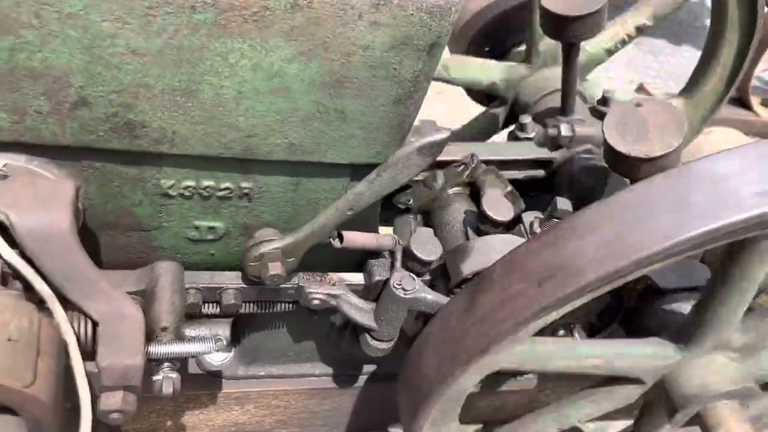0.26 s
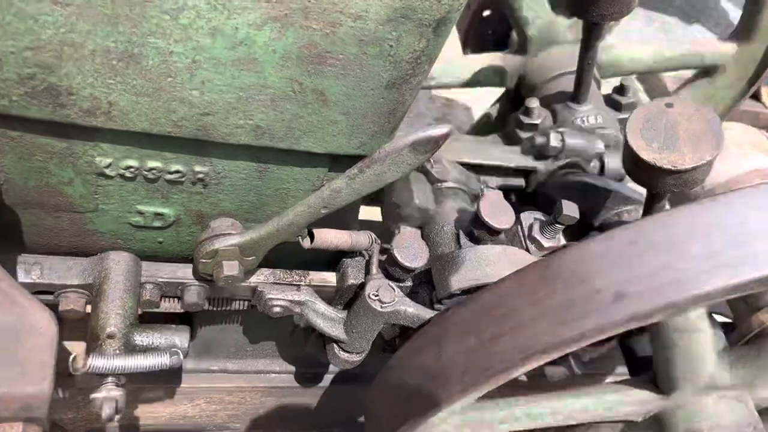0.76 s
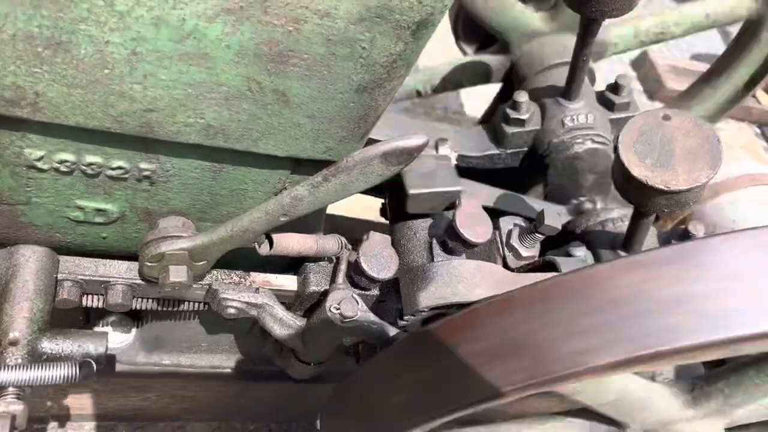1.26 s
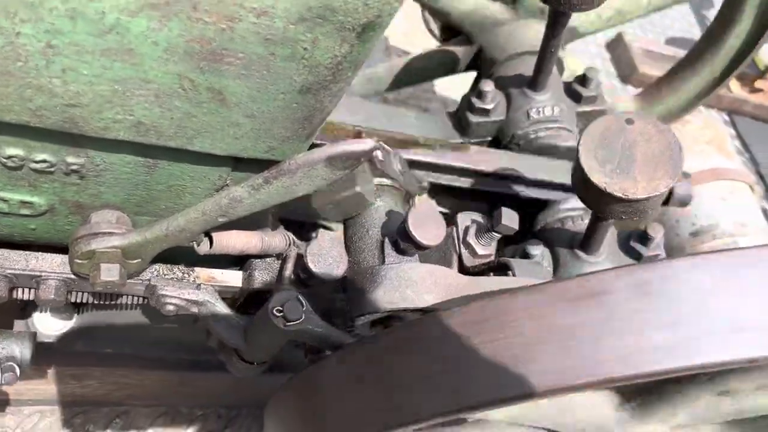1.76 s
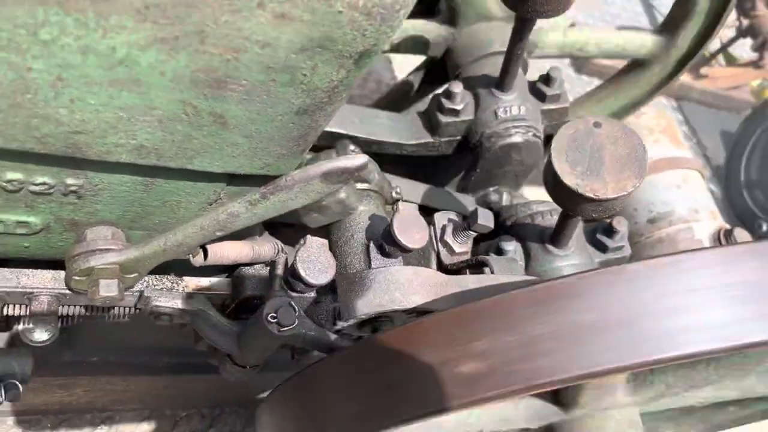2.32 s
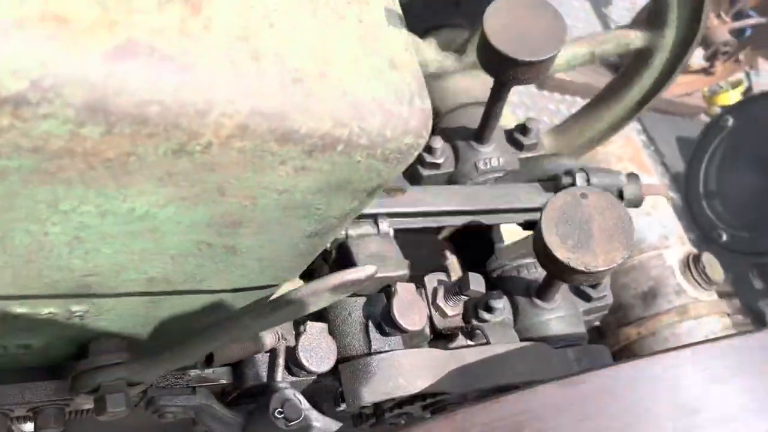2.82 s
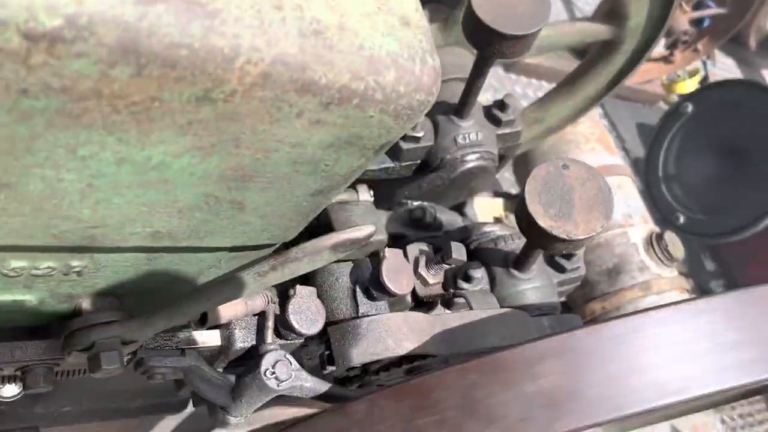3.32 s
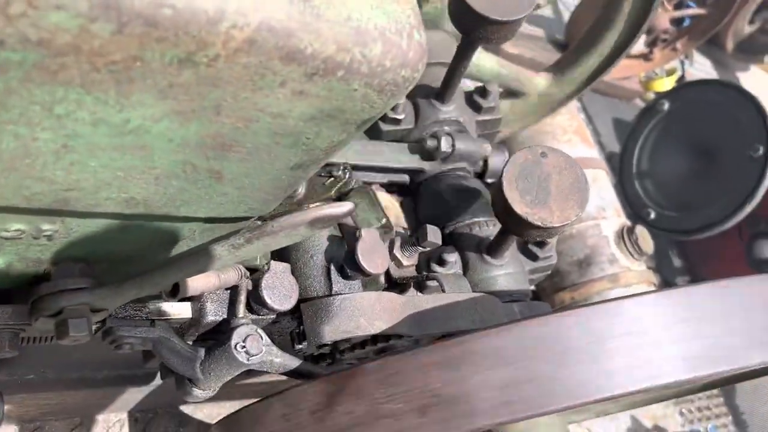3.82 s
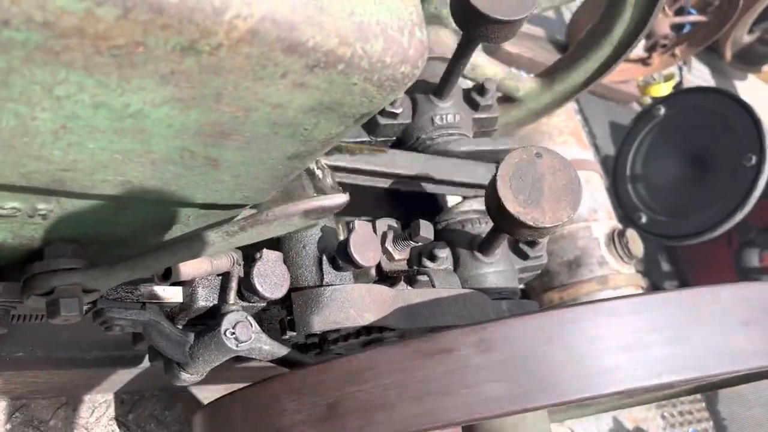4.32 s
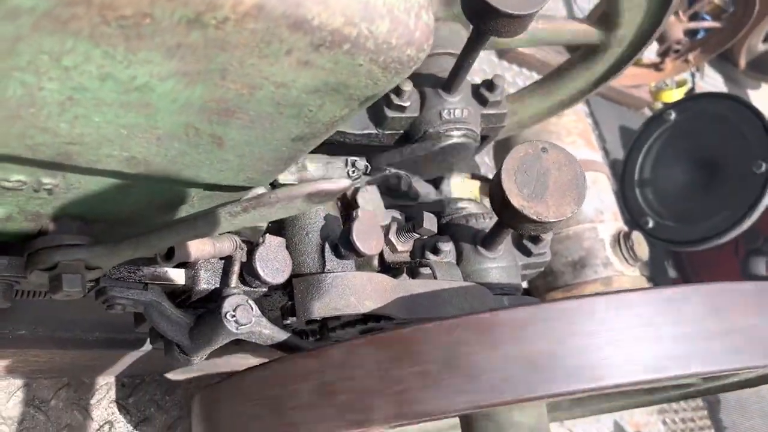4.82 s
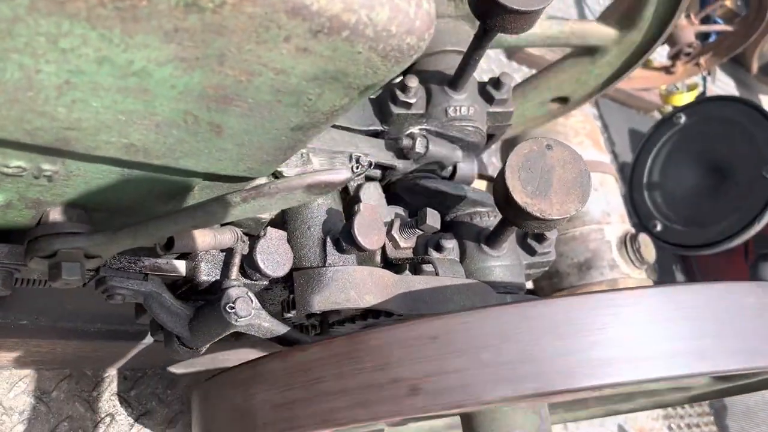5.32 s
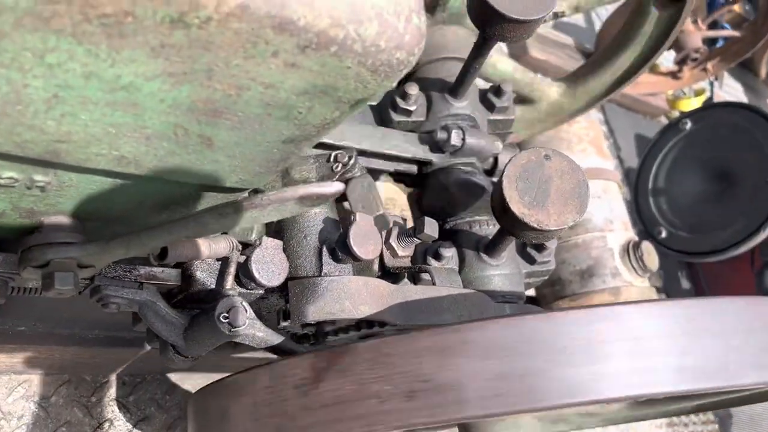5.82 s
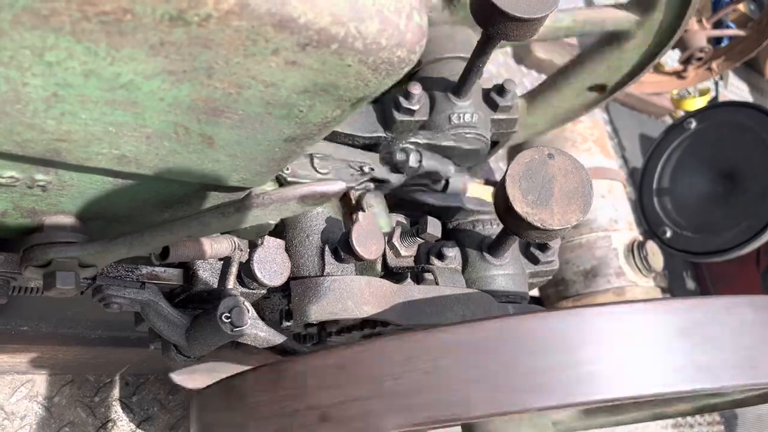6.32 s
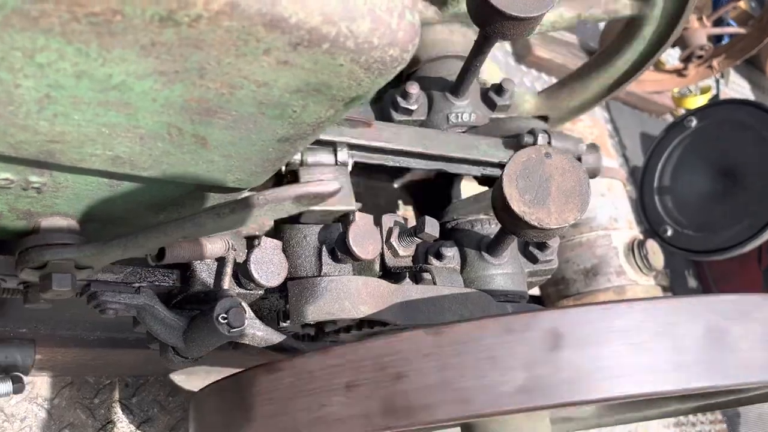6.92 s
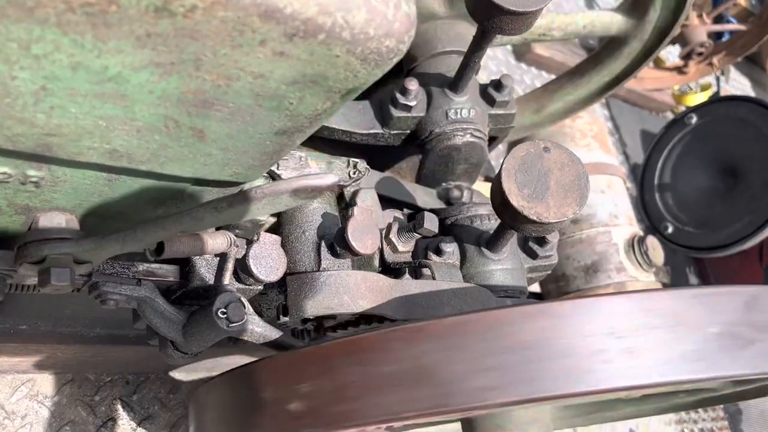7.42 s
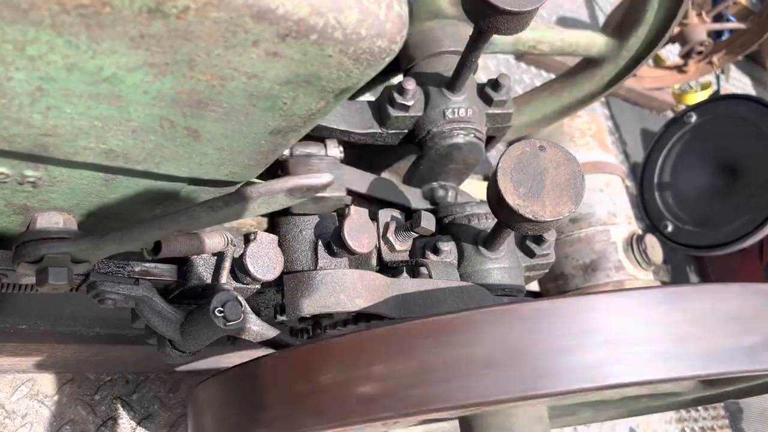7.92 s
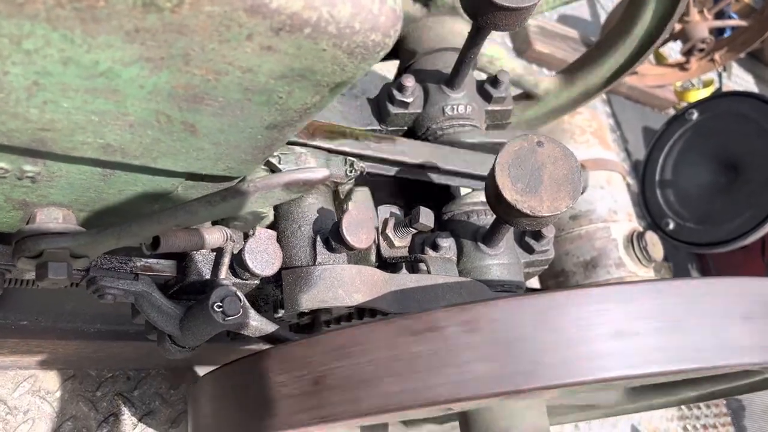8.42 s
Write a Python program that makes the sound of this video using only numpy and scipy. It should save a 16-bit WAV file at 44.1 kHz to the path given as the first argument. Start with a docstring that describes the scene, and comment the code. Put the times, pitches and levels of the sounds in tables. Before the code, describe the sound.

Close, dry outdoor stereo of an old stationary engine, busy from the first moment: low wavering drone, grainy rumble and loose gear clatter. A bright clank and small pop strike at 0.1 s. Around 0.5 s a neighbouring engine thumps low amid hard iron knocks; clustered clacks and sharp valve spits lead to a short, punchy exhaust blast at 0.87 s. The engine then coasts: push-rod clacks with brief metallic ringing fall roughly every 0.35 s, slowing to about 0.5 s by 6.8 s. Dull neighbouring thumps come near 1.6, 2.7, 3.2, 3.8, 4.9, 6.6 and 7.7 s. A bright clank, pop and air spit stand out around 2.05 s, with smaller pops and hisses near 3.2, 5.4 and 6.3 s. Rapid ticks and a hard clank precede the second blast at 7.2 s; afterwards the clacks quicken to every 0.35 s, continuing over rumble until the end at about 8.6 s.

```python
"""Open ground, microphone close to an old hit-and-miss engine, its sound taken in through two ports.
From the start the ground drones and rumbles, gears clatter and iron knocks, as noise through clusters of modes;
a smaller engine soon pops, valves hiss as flickering noise, and hard clanks ring on clear pitches.
Then a neighbouring engine thumps, a short low swing, and cam blows set the push rod's modes ringing.
The engine fires near 0.9 s, coasts through lengthening cycles, and fires again near 7.2 s: short pipe blasts."""
import sys
import numpy as np
from scipy import signal
from scipy.fft import rfft, irfft, next_fast_len
from scipy.io import wavfile
from scipy.ndimage import uniform_filter1d

SR = 44100
rng = np.random.default_rng(int(sys.argv[2]) if len(sys.argv) > 2 else 0)


def generate_wav(signal):
    """Clip the signal to [-1, 1] and save it as 16-bit WAV at the path in sys.argv[1]."""
    frames = np.transpose(np.atleast_2d(signal))
    scaled = np.clip(frames, -1, 1) * 32767
    pcm = np.round(scaled).astype(np.int16)
    wavfile.write(sys.argv[1], SR, pcm)


N = 381906  # samples

# Levels in the tables are relative to their own source; each source sets its final balance.

# low drone of the engines around, between its surges: (time [s], pitch [Hz], level [dB])
DRONE = [(0, 75.7, -33), (.45, 78.2, -32), (.75, 76.6, -47), (1.0, 65, -33), (2.05, 63.95, -34.5),
         (2.15, 75.1, -36), (2.55, 72.1, -33.5), (2.7, 80, -46), (3.0, 77.3, -33), (3.45, 86, -52),
         (4.1, 82.8, -36.5), (4.6, 73, -34), (5.1, 76, -34), (5.85, 72.5, -33), (6.0, 85.1, -37),
         (6.22, 72.2, -30.5), (6.45, 87, -33.5), (6.92, 76, -29.5), (7.1, 84.4, -32), (7.23, 71.6, -23),
         (7.5, 67, -40), (7.9, 75, -33.5), (8.66, 86, -37)]
# pitch and level of the drone after a thump, which first drowns it:
# (time after thump [s], pitch [Hz], change of level [dB])
WAKE = [(0.0, 75.63, -20), (0.028, 59.98, -10), (0.045, 45.03, 2.5), (0.08, 49.99, 0), (0.125, 70, 2),
        (0.155, 81.97, 1), (0.2, 83.9, -4)]
# surges of the drone: (time [s], level [dB], hold [s])
SURGES = [(0.06, -31, 0.063), (0.495, -20, 0.23), (0.916, -25, 0.069), (1.101, -29, 0.07),
          (1.587, -24.5, 0.079), (1.795, -29, 0.014), (1.917, -26, 0.079), (2.104, -25, 0.021),
          (2.279, -26.5, 0.038), (2.42, -29, 0.03), (2.694, -20.5, 0.14), (3.236, -22, 0.11),
          (3.792, -25.5, 0.12), (4.298, -36, 0.055), (4.49, -28.5, 0.031), (4.937, -26, 0.12),
          (6.186, -44, .04), (6.64, -23.5, 0.057), (6.87, -28, 0.063), (7.206, -24.5, 0.26),
          (7.72, -24.5, 0.22), (8.297, -35, 0.021), (8.45, -32, 0.025)]
SURGE_RISE_DB_PER_S, SURGE_FALL_DB_PER_S = 417, 267
SURGE_EDGE_DB = -10  # rough edge of a surge, against its tone
# spectrum of ground noise and rubbing parts: (frequency [Hz], level [dB])
WEAR = [(28, -28), (50, -0.5), (120, 0), (180, -4.5), (300, -6), (500, -8), (800, -13.5), (1200, -13),
        (2300, -19.5), (4500, -32), (8000, -46.5), (10000, -35), (13000, -98), (15700, -126)]
# running gear and ground: (time [s], gear clatter level [dB], ground noise level [dB])
RUNNING = [(0.0, -30, -25.5), (0.15, -29.5, -32.5), (0.4, -34, -31), (0.62, -29.5, -28.5),
           (0.95, -46, -29.5), (1.05, -33.5, -32.5), (1.36, -27, -30), (1.51, -30.5, -28.5),
           (1.62, -31.5, -32), (1.93, -37.5, -32), (2.07, -33, -27), (2.1, -52, -39), (2.17, -43, -36),
           (2.2, -37, -38), (2.28, -35.5, -31.5), (2.4, -37, -30), (2.56, -34, -35), (2.89, -31, -33.5),
           (3.02, -38, -33), (3.2, -32, -33), (3.76, -35, -35), (4.44, -34, -32.5), (4.67, -36, -38.5),
           (4.93, -35, -32.5), (5.35, -38, -34.5), (6.0, -37, -34), (6.54, -36, -36), (6.95, -31.5, -31),
           (7.09, -42, -35.5), (7.2, -35, -26), (7.42, -35, -32.5), (7.7, -30, -32), (8.03, -32, -36),
           (8.3, -33.5, -31), (8.66, -35.5, -34.5)]
JOLT_DB, JOLT_T60_S = -25, 0.23  # every blow shakes the ground noise up

# clusters of close modes in the cast iron frame and linkage: (frequency [Hz], width [Hz], level [dB])
IRON = [(292.4, 29, -16), (466, 190, -15), (676.4, 24, -18), (819, 340, -19), (945, 30, -19),
        (1025, 180, -16.5), (1176, 200, -8.5), (1465, 135, -11.5), (1794, 140, -18.5), (1200, 66, -19.5),
        (1733, 34, -22.5), (2248, 53, -21), (3200, 23, -28.5), (2203, 410, -15.5), (2623, 420, -16.5),
        (3180, 470, -21.5), (3660, 570, -28.5), (4070, 110, -30), (4500, 650, -28.5), (6250, 270, -30),
        (6820, 100, -29.5), (14500, 1200, -40)]
# other blows of iron on iron: from latch, igniter trip and machines nearby, and further linkage contacts and
# rebounds after cam blows: (time [s], peak level [dB], extra treble [dB], extra body [dB], ring pitch [Hz])
KNOCKS = [(0.0248, -28, -16, 11, 720), (0.1077, -6, 26, -8, 2040), (.2942, -20, -4, 0, 880),
          (0.409, -18.5, 2, -16, 1830), (0.472, -3, -22.5, 0, 1270), (0.479, -9, -33, 13, 1300),
          (0.463, -14, 0, -10, 1980), (0.5194, -16, 0, 22, 3660), (0.538, -12, -7, -15, 1950),
          (0.59, -13, 8, -7, 3080), (0.629, -15, -5, -15, 1900), (0.569, -5, -22, -37, 1600),
          (.601, -9, -2, -15, 1220), (0.611, -11, -14, -20, 1910), (0.703, -21.5, 32, 32, 610),
          (0.7716, -9.5, 4, -13, 3770), (0.7876, -3, 31, -18, 1860), (0.812, -9, 3, 8, 1890),
          (0.827, -8, -7, 5, 1930), (.846, -13, -15, -20, 1880), (.859, -9, -19, -20, 2010),
          (.8735, -8, 0, -23, 2110), (0.889, -8.5, -18, -32, 2540), (.907, -19, 17, -30, 3920),
          (1.1169, -21.5, 0, -5, 2220), (1.2249, -27, 0, -10, 2135), (1.242, -13, 4, 9, 990),
          (1.34, -16, -5, -15, 1890), (1.3995, -27, -13, -19, 2200), (1.5323, -16, 14, -10, 1880),
          (1.5724, -14, 14, 15, 736), (1.593, -6.5, 17, 3, 927), (1.6244, -9, -12, 12, 620),
          (1.6875, -15, -26, -11, 695), (1.793, -15, -14, -12, 2780), (1.8365, -15.5, -16, 15, 690),
          (1.8700, -17, 6, -8, 3170), (1.9008, -13, 17, -13, 4260), (1.912, -14, 7, -10, 4970),
          (1.925, -14.5, 15, -3, 3300), (1.936, -15.5, 14, -8, 4500), (1.945, -14.5, 5, 14, 601),
          (2.0445, -12.5, 2.5, 18, 725), (2.0567, -13, 32, -6, 4070), (2.068, -18, 10, -20, 3300),
          (2.076, -24, 5, -20, 2500), (2.442, -18, -10, -12, 1940), (2.318, -16, 5, -3, 1960),
          (2.6768, -15.5, -14, 0.5, 1250), (2.6828, -6, -33, 4, 1072), (3.089, -10, -11, 4, 1116),
          (3.2024, -13, 8, -20, 5900), (3.204, -11, -7, 3, 685), (3.219, -14.5, 9, 19, 2480),
          (3.232, -15.5, 2, -1, 2250), (3.609, -14, -21, -22, 2550), (3.446, -35, 0, -17, 1750),
          (3.506, -27, 5, -5, 4200), (3.74, -33, -10.5, -15, 2280), (3.79, -28, -6, -10, 1254),
          (3.777, -19, -19, 15, 334), (3.9057, -16, -3, 5.5, 1148), (4.26, -9, 6, 11.5, 980),
          (4.7229, -11, 11, 12, 2640), (4.9005, -7.5, 7, -7, 498), (4.904, -6.5, -5, -8, 1590),
          (4.912, -14, -15, -10, 2276), (4.919, -24, -16, -11, 1004), (5.224, -21, 10, -20, 1730),
          (5.362, -18, -2, 3, 2520), (5.375, -15.5, 12, 18, 5650), (5.5438, -34, -12, -10, 1780),
          (5.559, -12, -9, -13, 2080), (5.571, -12.5, -3, -10, 1298), (5.688, -21, 2, -12, 1800),
          (5.851, -23, -3, -10, 2485), (6.3178, -8.5, 6, -22, 1560), (6.565, -19, 14, -5, 1170),
          (6.6048, -3.5, -41, 4, 1317), (6.848, -20, 27, -1, 1820), (6.8996, -12, 26, -23, 1995),
          (6.9327, -12, 24, -8, 1930), (7.036, -23, 39, -14, 1970), (7.1136, -8.5, 24, -27, 2470),
          (7.1275, -7.5, 23, -24, 1970), (7.144, -10.5, 18, -9, 2300), (7.165, -13, 8, -15, 2300),
          (7.177, -14, -10, -20, 1850), (7.217, -12, 8, -8, 2420), (7.2484, -15, 11, -8, 2360),
          (7.523, -16, -2, -16, 1700), (7.5804, -19, 3, -5, 2204), (7.676, -17.5, -12, -20, 2196),
          (7.718, -5, -17, -2, 1280), (7.726, -22, -8, -6, 3140), (7.9092, -17, 16, -6, 1830),
          (8.1713, -34, 0, -12, 2210), (8.2367, -27, 11, -10, 1930), (8.398, -21, -5, -10, 2480),
          (8.6052, -21, -5, -12, 1804), (8.42, -11, -36, -26, 1774)]
# the push rod drops off the cam once a cycle; cycles lengthen as the flywheels coast, shorten after a firing:
# (time [s], peak level [dB], extra treble [dB], extra body [dB], ring pitch [Hz])
CAM = [(0.468, 0, -20, 4, 1206), (0.938, -10, 1, -16, 990), (1.2831, -1.5, 27, -12, 1213),
       (1.6399, -3, -13, 3, 1664), (2.0038, -2, 4, 5.5, 1726), (2.377, -2.5, -8, -2.5, 1210),
       (2.761, -7, -17, 2, 1720), (3.1529, -7.5, 26, 0, 1210), (3.558, -8, 27, 6, 1737),
       (3.9764, -8, -18, 7, 1720), (4.4077, -9.5, -10, 11, 1250), (4.8511, -9, 36, -7, 2060),
       (5.3106, -4.5, 34, -26, 1120), (5.7872, -7, 6, -2, 2114), (6.2831, -7.5, -9, 4, 1182),
       (6.7963, -14.5, -24, -2, 682), (7.279, -15.5, 5, 7, 1088), (7.625, -3.5, 15, -5, 950),
       (7.979, -5.5, -4, 14, 1096), (8.341, -7, 15, 3, 1230)]
# light contacts of the linkage in every cycle:
# (share of the cycle [0-1], peak level [dB], extra treble [dB], extra body [dB], ring pitch [Hz])
LINKAGE = [(0.14, -19, -45, -41, 1897), (0.53, -32, 0, 16, 698), (0.71, -27, -7, -15, 1875),
           (0.872, -21, 5, 0, 683)]
LINKAGE_SLOP, LINKAGE_SPREAD_DB = .012, 3  # timing spread as a share of the cycle; level spread
CAM_T60_S, BLOW_T60_S = 0.04, 0.092  # decay of the mode clusters at 1500 Hz
CONTACT_BUILD_S, RING_BUILD_S = .0009, .0015
CHATTER_DB, CHATTER_PER_S = 4, 140  # a blow lands as a run of uneven bounces
HIGH_RING_HZ, TOP_RING_HZ, RING_PITCH_SPREAD = 2320, 4125, 0.1486  # spread in natural log of pitch
RING_T60_S, RING_SPREAD_DB = 0.067, 2.5
TOP_FADE_S = .008  # extra decay constant: the highest ring dies early
CLATTER_SWING_DB, CLATTER_PEAK_SHARE = 0.5, 0.98  # the gears are loudest around the cam's work
CLATTER_FLICKER_DB = 3.2
PING_DETUNE, PING_T60_S, PINGS_PER_S = .045, .11, 40

# short exhaust pops of a smaller engine nearby: (time [s], level [dB])
POPS = [(0.104, -11.5), (0.593, -12), (0.624, -14), (2.045, -10.5), (3.202, -16.5), (4.26, -33),
        (4.719, -29), (5.364, -26), (5.555, -19.5), (6.315, -15), (6.92, -13)]
POP_HZ, POP_S = 193, 0.0032

# air forced past the valves; rise or fall times near or below zero mean the fastest allowed:
# (time [s], peak level [dB], time to rise 30 dB [s], time to fall 30 dB [s])
PUFFS = [(0.109, -49, 0.2, 0.6), (0.572, -36.5, -0.54, 0.24), (0.767, -20, -0.05, -0.07),
         (0.872, -20, 0, 0), (1.031, -52, 0.6, 0.06), (1.53, -40.5, 0.07, 0.5), (1.58, -21, -0.18, -0.06),
         (1.909, -23, -0.5, 0.07), (2.055, -19, -0.12, -0.13), (2.675, -60, 2, 2), (3.094, -44, 0.07, -0.1),
         (3.202, -51.5, -0.5, 0.6), (4.411, -39, -0.26, -0.1), (4.882, -72, 9, 2), (5.161, -55, 1.5, 0.1),
         (5.28, -49, 0.5, 0.4), (5.379, -24, 0, -0.08), (5.558, -64, -3, 1), (6.315, -54, 1, 1),
         (6.6, -51, 0, 0), (6.91, -40.5, 0.2, 0.17), (7.115, -36, 0, 0.2), (7.217, -41, 0.1, -0.17),
         (7.626, -67, 6, -3)]
# bright spits and ticks at the valves: (time [s], peak level [dB])
SPITS = [(0.109, -14), (0.5192, -29), (0.541, -17), (0.565, -9.5), (0.59, -15), (0.6863, -25.5),
         (0.712, -23), (0.7457, -18.5), (0.772, -5.5), (0.812, -15), (0.8286, -25), (0.873, -5),
         (1.0274, -13.5), (1.6305, -19), (1.868, -11.5), (1.895, -16), (2.046, -2.5), (3.0836, -37),
         (3.2017, -16), (3.506, -27.5), (4.2467, -27), (4.2632, -22), (4.4099, -33), (4.7044, -25),
         (4.722, -25), (4.883, -23), (5.0904, -41), (5.11, -19.5), (5.1373, -38), (5.156, -27),
         (5.372, -10), (5.5552, -23), (5.7259, -34), (6.2861, -37), (6.313, -15.5), (6.4912, -36),
         (6.8963, -32), (6.923, -18.5), (7.0219, -31), (7.0476, -26.5), (7.083, -25), (7.1135, -7),
         (7.128, -35), (7.208, -13), (7.217, -7.5), (7.6256, -36)]
SPIT_BUILD_S, SPIT_T60_S = .002, 0.051
# spectrum of the escaping air: (frequency [Hz], level [dB])
AIR = [(600, -0.5), (1500, -26), (2500, -4.5), (4200, -0.5), (6000, -1.5), (8500, 2), (11000, 4),
       (13500, -2.5), (15700, -6)]

# clear pitches that stand out of the hardest clanks: (time [s], peak level [dB],
# low pitch [Hz], middle pitch [Hz], high pitch [Hz], low level [dB], middle level [dB], high level [dB])
CLANKS = [(0.109, -6.5, 890, 2060, 6240, -13, -10, -10), (0.472, -5, 1225, 2150, 3000, -2, -18, -10),
          (0.569, -10, 1520, 1880, 6450, -4, -15, -13), (0.773, -7, 1500, 1920, 3870, -15, -10, -9),
          (0.938, -11, 950, 1770, 4050, -13, -9.5, -10), (1.284, -4, 1194, 2130, 3660, -3, -10, -13),
          (1.641, -8, 1207, 1750, 4910, -8, -14, -17), (1.904, -13, 1180, 2230, 4070, -10, -14, -7),
          (2.004, -9, 1225, 1830, 5130, -6, -14.5, -18), (2.046, -8, 665, 2130, 3380, -10, -14, -4),
          (2.057, -7, 635, 2560, 4200, -11, -12, -11), (2.378, -9, 1184, 1800, 3740, -16, -7, -16),
          (2.682, -14, 1070, 2410, 3440, -10, -13, -13), (2.76, -12, 1210, 1750, 3670, -7, -10, -19),
          (3.154, -8, 1190, 1710, 3680, -6, -11, -12), (3.203, -11, 703, 2480, 5890, -10, -11.5, -8),
          (3.217, -13, 1300, 2430, 4300, -10, -12, -11), (3.56, -11, 695, 1750, 3620, -14, -12, -15),
          (3.978, -9, 1210, 1730, 3670, -8, -13, -14.5), (4.262, -7.5, 973, 2580, 3730, -13, -6.5, -16),
          (4.407, -14, 722, 1900, 3560, -10, -16, -13), (4.721, -16, 670, 2550, 4370, -12, -14, -14),
          (4.851, -9.5, 970, 1746, 4730, -11.5, -8.5, -12.5), (4.906, -10, 687, 1540, 3360, -9, -10, -15),
          (5.31, -7, 1118, 2155, 3920, -16, -10, -16), (5.56, -16, 1360, 2110, 3136, -10, -9, -15),
          (5.789, -10, 704, 2180, 3750, -6, -19, -13), (6.283, -11, 1190, 1830, 3680, -14, -13, -10),
          (6.317, -12, 1580, 2450, 3930, -10, -6.5, -17), (6.607, -13, 1285, 1940, 4880, -4, -16, -18),
          (7.115, -4, 1470, 2411, 3470, -11, -9, -10.5), (7.127, -7, 618, 2495, 4000, -11, -10, -9),
          (7.217, -13, 623, 2490, 4230, -14, -10, -13), (7.625, -11, 1130, 2146, 3980, -13, -17, -13),
          (7.723, -10, 1280, 2300, 3257, -12, -12, -8), (7.981, -8, 1110, 1910, 3660, -14, -10, -18),
          (8.342, -15, 1220, 1714, 3935, -8, -12, -17)]
# decay of the low, middle and high pitch: (t60 [s])
CLANK_T60_S = [0.092, 0.052, 0.047]
LATCH_S, LATCH_DB, LATCH_HZ, LATCH_HOLD_S = 2.058, -17, 650, .03  # the latch hums as it seats

# the neighbour fires: (time [s], thump level [dB])
NEIGHBOUR = [(0.467, -7.5), (1.572, -10.5), (2.68, -11), (3.228, -11.5), (3.785, -11.5), (4.901, -5.5),
             (6.605, -8.5), (7.718, -7), (1.031, -21)]
THUMP_HZ, THUMP_PEAK_S, THUMP_WIDTH_S = 74, .010, 0.0094
THUMP_PHASE = .3  # radians

# modes of the push rod, rung by every cam blow: (frequency [Hz], level [dB], t60 [s])
ROD = [(955, -17.5, 0.089), (1192, -13, 0.098), (1650, -25, 0.037), (2100, -18, 0.065), (2830, -43, 0.044),
       (3696, -18, 0.045), (4350, -19, 0.023), (4900, -22, 0.045), (6480, -18, 0.023)]
# the rod lands in bounces: (time after the blow, before slop [s], level [dB])
ROD_TOUCHES = [(0, -5), (.0017, -3), (.004, -5), (.009, -10)]
ROD_SPREAD_DB = 2

# this engine fires: (time [s], level [dB], pipe pitch at the start [Hz])
FIRINGS = [(0.8684, -3.5, 390), (7.2088, -4.5, 377)]
PUSH_LEAD_S = .015  # the low push starts ahead of the blast

# phase lead of the left port for direct sound: (frequency [Hz], lead [radians])
LEFT_LEADS = [(60, .08), (150, .25), (520, .6), (1460, 3.4), (1810, 6.2), (2760, 7.1), (3010, 7.6),
              (3700, 6.9), (6720, 4.9), (7750, 3.3), (9130, 2.9), (11100, 0.0), (13400, -0.1),
              (14000, -2.8), (15300, -3.2)]
# level of the left port over the right for direct sound: (frequency [Hz], level [dB])
LEFT_LOUDER = [(60, 0), (200, 1), (380, -.5), (1290, -.3), (2380, 2), (4400, 2), (8120, .3), (15000, 0)]
# scattered sound against direct sound: (frequency [Hz], level [dB])
SCATTER = [(60, -28), (150, -18), (300, -11), (700, -6), (1500, -7), (4000, -4.5), (8000, -12),
           (15000, -13)]
TOP_CUT_HZ = 16014  # from here up the recorder is 70 dB down


def from_db(db):
    """Gain of a level in dB."""
    return 10 ** (np.asarray(db) / 20)


def rms_one(x):
    """Scale to rms 1."""
    return x / np.sqrt(np.mean(x ** 2) + 1e-20)


def in_time(rows):
    """Columns of a curve table, one value a sample."""
    s, *columns = np.transpose(rows)
    return [np.interp(np.arange(N) / SR, s, c) for c in columns]


def at_hz(points, hz):
    """Read a spectrum on a log-frequency axis."""
    at, value = np.transpose(points)
    return np.interp(np.log(hz + 1), np.log(at + 1), value)


def drift(rate):
    """Slow chance of rms 1: noise low-passed at rate [Hz], drawn every 40 samples."""
    r = np.exp(-80 * np.pi * rate / SR)
    white = rng.standard_normal(N // 40 + 2002)
    slow = signal.lfilter([1], [1, -2 * r, r * r], white)[2000:]
    return np.interp(np.arange(N) / 40, np.arange(len(slow)), rms_one(slow))


def ring(clicks, hz, t60):
    """A unit click sets a decaying sine of height 1 ringing."""
    r, w = from_db(-60 / (t60 * SR)), 2 * np.pi * hz / SR
    return signal.lfilter([0, np.sin(w)], [1, -2 * r * np.cos(w), r * r], clicks + 1e-18)


def cluster(x, hz, width_hz):
    """A resonance of gain 1 on top."""
    r = np.exp(-np.pi * width_hz / SR)
    poles = [1, -2 * r * np.cos(2 * np.pi * hz / SR), r * r]
    return signal.lfilter(np.array([1, 0, -1]) * (1 - r * r) / 2, poles, x)


def coloured(spectrum, ref_hz):
    """Noise of a given spectrum, rms 1 inside the band ref_hz."""
    hz = np.fft.rfftfreq(N, 1 / SR)
    z = rfft(rng.standard_normal(N)) * from_db(at_hz(spectrum, hz))
    inside = (hz > ref_hz[0]) & (hz < ref_hz[1])
    return irfft(z, N) * N / np.sqrt(2 * np.sum(np.abs(z[inside]) ** 2))


def ramps(s, peak_db, rise, hold, fall):
    """Gain of the loudest of many swells that rise and fall at so many dB a second."""
    at = np.arange(0, N, 48)
    t = at[:, None] / SR - s
    slope_db = np.minimum(rise * t, fall * (hold - t))
    level_db = np.max(peak_db + np.minimum(0, slope_db), axis=1)
    return from_db(np.interp(np.arange(N), at, level_db))


def overlay(span, grains):
    """Sum overlapping grains at their sample numbers."""
    return np.bincount(span.ravel(), grains.ravel(), N + SR)[:N]


def ground(noise):
    """A nearly pure low drone with a rough edge; a broad wash of noise with a boom lies over it."""
    drone_hz, drone_db = in_time(DRONE)
    after, wake_hz, wake_db = np.transpose(WAKE)
    drowned_db = np.zeros(N)
    t = np.arange(round(after[-1] * SR)) / SR
    for s, _ in NEIGHBOUR:
        drone_hz[round(s * SR):][:len(t)] = np.interp(t, after, wake_hz)
        drowned_db[round(s * SR):][:len(t)] = np.interp(t, after, wake_db)
    phase = 2 * np.pi * np.cumsum(drone_hz) / SR + .3 * drift(20)
    tone = from_db(uniform_filter1d(drowned_db, size=300)) * np.sqrt(2) * np.sin(phase)
    edge = rms_one(ring(rng.standard_normal(N), 86.5, 0.052))
    bed = from_db(drone_db + 1.2 * drift(28))
    s, surge_db, hold = np.transpose(SURGES)
    surges = ramps(s, surge_db, SURGE_RISE_DB_PER_S, hold, SURGE_FALL_DB_PER_S)
    drone = bed * (tone + edge) + surges * (tone + from_db(SURGE_EDGE_DB) * edge)
    boom = from_db(-5.0) * rms_one(ring(rng.standard_normal(N), 172.2, 0.13))
    wash = coloured(WEAR, (120, 700)) * from_db(1.3 * drift(11))
    return drone + noise * (wash + boom)


def cam_marks():
    """Times of the cam blows, with one cycle added at each end."""
    s = np.transpose(CAM)[0]
    return np.r_[2 * s[0] - s[1], s, 2 * s[-1] - s[-2]]


def blows():
    """Every blow as columns: time [s], peak, treble, body [dB], ring pitch [Hz], t60 [s]."""
    marks = cam_marks()
    chance = rng.standard_normal((len(CAM) + 1, len(LINKAGE), 2))
    light = []
    for start, end, row in zip(marks, marks[1:], chance):
        for (share, db, *rest), (late, louder) in zip(LINKAGE, row):
            s = start + (end - start) * (share + LINKAGE_SLOP * late)
            light.append((s, db + LINKAGE_SPREAD_DB * louder, *rest, BLOW_T60_S))
    cam = [(*row, CAM_T60_S) for row in CAM]
    knocks = [(*row, BLOW_T60_S) for row in KNOCKS]
    rows = np.array(cam + knocks + light)
    return rows[(rows[:, 0] > 0) & (rows[:, 0] < N / SR)].T


def gear_teeth():
    """Loose teeth meet in a random rain of short decaying contacts, rms 1."""
    meets = rng.random(N) < 1500 * from_db(2.5 * drift(15)) / SR
    clicks = meets * from_db(3 * np.minimum(rng.exponential(1, N), 5))
    return rms_one(signal.lfilter([1], [1, -np.exp(-1 / (0.0029 * SR))], clicks + 1e-18))


def struck_rings(span, t, peak_db, low_hz):
    """Each struck part itself rings on three pitches of its own."""
    chance = rng.standard_normal((len(peak_db), 2))
    high_hz, top_hz = ([HIGH_RING_HZ, TOP_RING_HZ] * np.exp(RING_PITCH_SPREAD * chance)).T
    high, top = from_db(RING_SPREAD_DB * rng.standard_normal((len(peak_db), 2))).T[..., None]
    dying = from_db(peak_db[:, None] - 60 * t / RING_T60_S) * (1 - np.exp(-t / RING_BUILD_S))
    rings = from_db(-9.5) * np.sin(2 * np.pi * low_hz[:, None] * t)
    rings += from_db(-26.0) * high * np.sin(2 * np.pi * high_hz[:, None] * t)
    rings += from_db(-23) * top * np.exp(-t / TOP_FADE_S) * np.sin(2 * np.pi * top_hz[:, None] * t)
    return overlay(span, dying * rings)


def iron(clatter_db, struck):
    """Knocks and loose gear teeth shake the same mode clusters; each blow feeds them unevenly, highs die first."""
    s, peak_db, treble_db, body_db, low_hz, t60 = struck
    t = np.arange(SR // 14) / SR
    span = np.round(s * SR).astype(int)[:, None] + np.arange(SR // 14)
    # power of the contact: builds up, hardest at first
    contact = (1 - np.exp(-t / CONTACT_BUILD_S)) ** 2 * (1 + 2.15 * np.exp(-t / 0.011))
    spread_db = rng.normal(0, 2.0, (len(s), len(IRON)))
    teeth, clatter = gear_teeth(), from_db(clatter_db)
    # one run of bounces for the lower clusters, one for those above 2400 Hz
    chatter = [rms_one(from_db(CHATTER_DB * drift(CHATTER_PER_S))) for _ in range(2)]
    out, white = np.zeros(N), rng.standard_normal((2, N))
    for k, (hz, width_hz, level_db) in enumerate(IRON):
        high = np.clip(np.log2(hz / 1500) / 3, -1, 1)  # 1 at full treble, -1 at full body
        blow_db = peak_db + np.where(high > 0, treble_db, -body_db) * high + spread_db[:, k]
        fall = np.log(1000) / (t60 * (1500 / hz) ** 0.5)
        power = from_db(2 * blow_db)[:, None] * np.exp(-2 * fall[:, None] * t) * contact
        knocks = from_db(-1.0) * np.sqrt(overlay(span, power)) * chatter[int(hz > 2400)]
        gears = clatter * from_db(11 + CLATTER_FLICKER_DB * drift(6.0)) * teeth
        even = np.sqrt(SR / width_hz / 40)  # makes up for a narrow cluster passing less noise
        out += from_db(level_db) * even * cluster((knocks + gears) * white[k % 2], hz, width_hz)
        # loose parts ping at the cluster's pitch and beside it now and then
        if 600 < hz < 5000:
            draw = rng.random(N) * SR / PINGS_PER_S
            pings = white[1 - k % 2] * clatter * from_db(level_db + 8.5)
            beside_hz = hz * (1 + PING_DETUNE * (-1) ** k)
            out += ring(pings * (draw < 1), hz, PING_T60_S)
            out += ring(pings * (draw > SR / PINGS_PER_S - 1), beside_hz, PING_T60_S)
    return out + struck_rings(span, t, peak_db, low_hz)


def pops():
    """Exhaust of a smaller engine: a cycle or two of a small pipe, quickly swelling and dying."""
    out, t = np.zeros(N), np.arange(round(.05 * SR)) / SR
    pop = np.sin(2 * np.pi * POP_HZ * t) * t / POP_S * np.exp(1 - t / POP_S)
    for s, peak_db in POPS:
        out[round(s * SR):][:len(t)] -= from_db(peak_db) * pop
    return out


def valves():
    """Bright turbulent air: fluttering puffs and short spits."""
    s, peak_db, rise_s, fall_s = np.transpose(PUFFS)
    gain = ramps(s, peak_db, 30 / np.maximum(rise_s, .002), 0, 30 / np.maximum(fall_s, .005))
    gain = gain * from_db(3.0 + 2.0 * drift(110))
    t = np.arange(SR // 8) / SR
    build = 1 - np.exp(-t / SPIT_BUILD_S)
    for s, peak_db in SPITS:
        gain[round(s * SR):][:len(t)] += from_db(peak_db - 6.5 - 60 * t / SPIT_T60_S) * build
    return gain * coloured(AIR, (9000, 14000))


def clanks():
    """Three pitches ring out of each hard clank, slightly unsteady; the latch hums once."""
    out, t = np.zeros(N + SR), np.arange(SR // 8) / SR
    start = rng.uniform(0, 2 * np.pi, (len(CLANKS), 3))
    build = 1 - np.exp(-t / RING_BUILD_S)
    for (s, peak_db, *rest), phase in zip(CLANKS, start):
        hz, level_db = np.reshape(rest, (2, 3, 1))
        dying = from_db(peak_db + level_db - 60 * t / np.c_[CLANK_T60_S]) * build
        pitches = dying * np.sin(2 * np.pi * hz * t + phase[:, None])
        out[round(s * SR):][:len(t)] += np.sum(pitches, axis=0)
    seat = np.arange(round(LATCH_HOLD_S * SR))
    hum = np.sqrt(np.hanning(len(seat))) * np.sin(2 * np.pi * LATCH_HZ * seat / SR)
    out[round(LATCH_S * SR) + seat] += from_db(LATCH_DB) * hum
    return out[:N] * from_db(CHATTER_DB * drift(60))


def neighbour():
    """The neighbouring engine: a dull thump, a short low swing with a rattle of its pipe."""
    out, t = np.zeros(N), np.arange(round(.1 * SR)) / SR
    late = t - THUMP_PEAK_S
    swing = np.cos(2 * np.pi * THUMP_HZ * late + THUMP_PHASE) * np.exp(-(late / THUMP_WIDTH_S) ** 2)
    thump = swing * np.minimum(t / 0.0043, 1)
    pipe = 0.19 * np.sin(2 * np.pi * 470 * t) + 0.1 * np.sin(2 * np.pi * 210 * t)
    rattle = t / 0.0063 * np.exp(1 - t / 0.0057) * pipe
    for s, thump_db in NEIGHBOUR:
        out[round(s * SR):][:len(t)] += from_db(thump_db) * (thump + rattle)
    return out


def rod():
    """Each cam blow rings the same push rod modes, with new strengths."""
    s, peak_db = np.transpose(CAM)[:2]
    slop = rng.uniform(.7, 1.3, len(s))  # stretches the bounces of each blow
    spread_db = rng.normal(0, ROD_SPREAD_DB, (len(s), len(ROD)))
    out = np.zeros(N)
    for k, (hz, level_db, t60) in enumerate(ROD):
        clicks = np.zeros(N)
        for late_s, touch_db in ROD_TOUCHES:
            at = np.round((s + late_s * slop) * SR).astype(int)
            clicks[at] = from_db(peak_db + level_db + touch_db + spread_db[:, k])
        soft = np.convolve(clicks, np.hanning(8) / 3.5)[:N]
        out += ring(soft, hz, t60)
    return out


def firings():
    """A blast rings the short exhaust pipe, sinking in pitch, as a low push ebbs; a low echo follows."""
    out, t = np.zeros(N), np.arange(round(.1 * SR)) / SR
    early = t - PUSH_LEAD_S
    push = -from_db(-6) * np.sin(2 * np.pi * 55 * (early - .0045)) * np.exp(-((early - .001) / .0065) ** 2)
    echo = from_db(-4.5) * np.sin(2 * np.pi * 90 * (t - .037)) * np.exp(-((t - .043) / 0.0077) ** 2)
    for s, peak_db, pipe_hz in FIRINGS:
        turns = pipe_hz * (t - 36 * t ** 2)
        blast = np.sin(2 * np.pi * turns) * np.minimum(t / .0006, 1) * np.exp(-(t / .0058) ** 3)
        out[round((s - PUSH_LEAD_S) * SR):][:len(t)] += from_db(peak_db) * push
        out[round(s * SR):][:len(t)] += from_db(peak_db) * (blast + echo)
    return out


def ports(x):
    """The two ports differ in phase and level; scatter off moving parts slips in phase, opposite in the two."""
    size = next_fast_len(N + SR // 4)
    hz = np.fft.rfftfreq(size, 1 / SR)
    # half the difference goes to each port
    half = np.exp(.5j * at_hz(LEFT_LEADS, hz)) * from_db(at_hz(LEFT_LOUDER, hz) / 2)
    direct = rfft(x, size)
    analytic = 2 * np.fft.ifft(direct * from_db(at_hz(SCATTER, hz)), size)[:N]
    scattered = rfft((analytic * np.exp(3j * drift(9))).real, size)
    return irfft([half * (direct + scattered), (direct - scattered) / half], size)[:, :N]


def scene():
    """All sources as the two ports hear them."""
    clatter_db, noise_db = in_time(RUNNING)
    marks, struck = cam_marks(), blows()
    cycles = np.interp(np.arange(N) / SR, marks, np.arange(len(marks)))
    clatter_db = clatter_db + CLATTER_SWING_DB * np.cos(2 * np.pi * (cycles - CLATTER_PEAK_SHARE))
    jolts = ramps(struck[0], struck[1] + JOLT_DB, 950, 0, 60 / JOLT_T60_S)
    around = ground(from_db(noise_db) + jolts) + pops() + neighbour()
    engine = iron(clatter_db, struck) + valves() + clanks() + rod() + firings()
    return ports(around + engine)


def record(dry):
    """The microphone drops the deepest bass, peaks are rounded, the top is cut."""
    heard = signal.sosfilt(signal.butter(4, 40, "high", fs=SR, output="sos"), dry)
    rounded = .96 * np.tanh(heard / .96)
    return signal.sosfilt(signal.cheby2(12, 70, TOP_CUT_HZ, fs=SR, output="sos"), rounded)


dry = scene()
out = record(dry)
generate_wav(out)
```